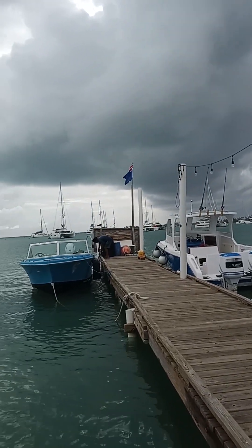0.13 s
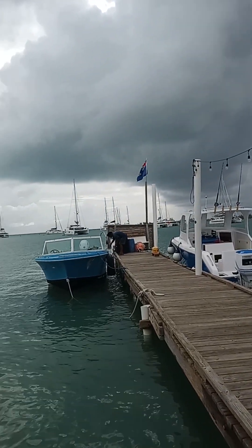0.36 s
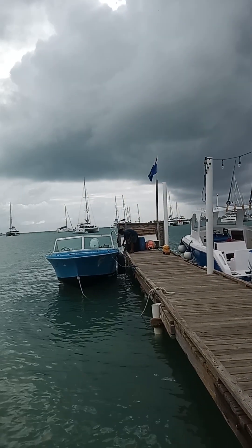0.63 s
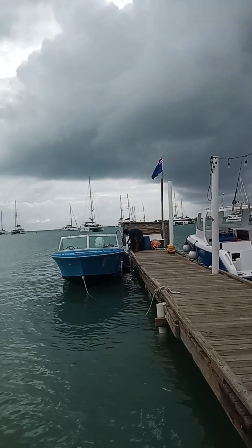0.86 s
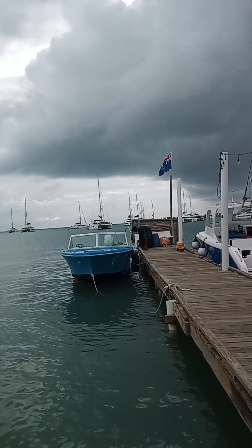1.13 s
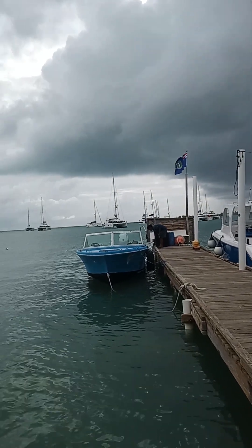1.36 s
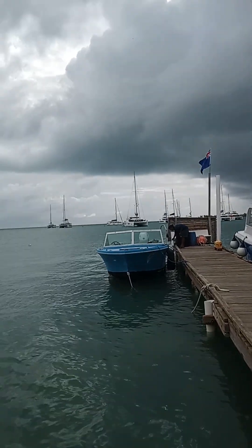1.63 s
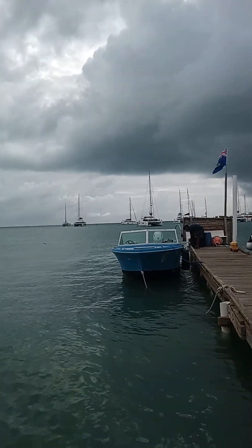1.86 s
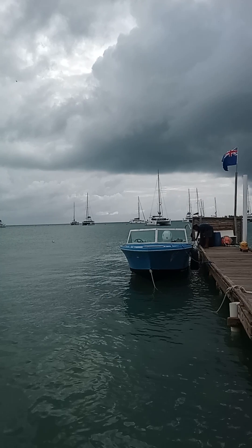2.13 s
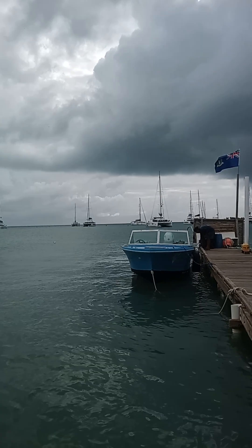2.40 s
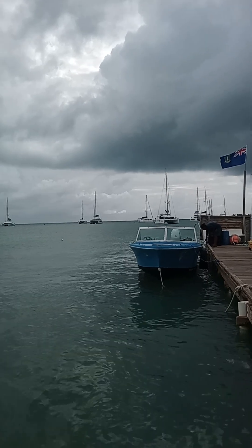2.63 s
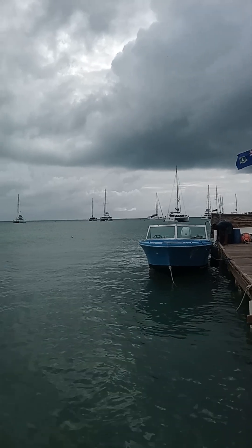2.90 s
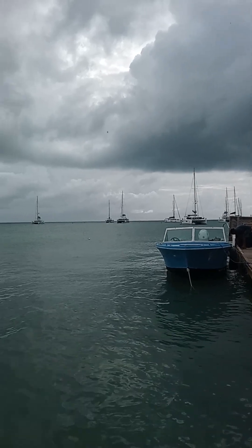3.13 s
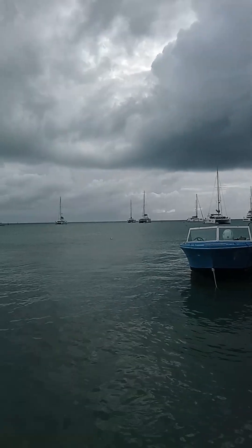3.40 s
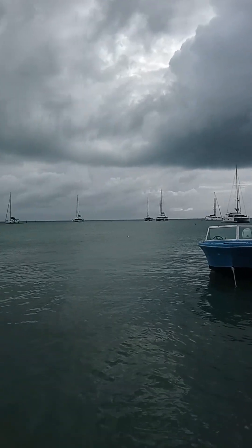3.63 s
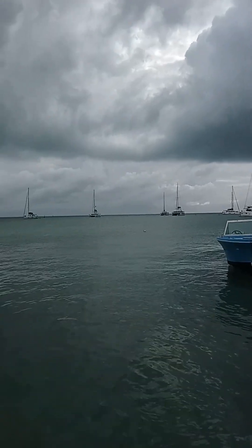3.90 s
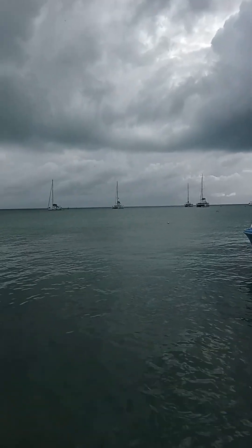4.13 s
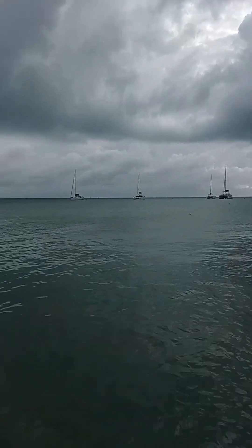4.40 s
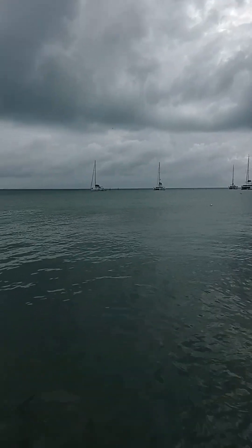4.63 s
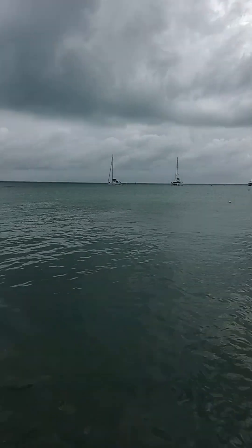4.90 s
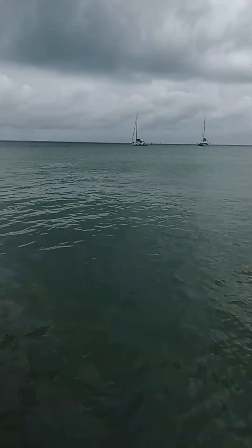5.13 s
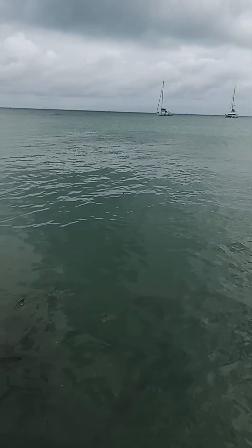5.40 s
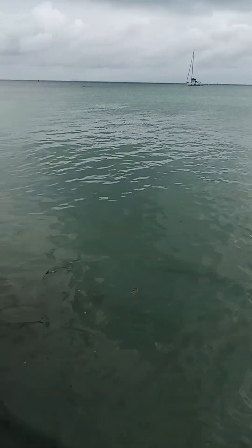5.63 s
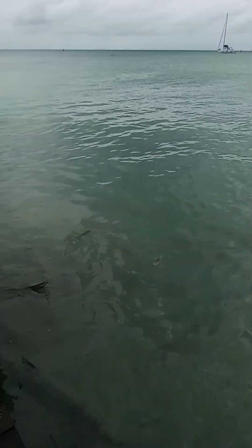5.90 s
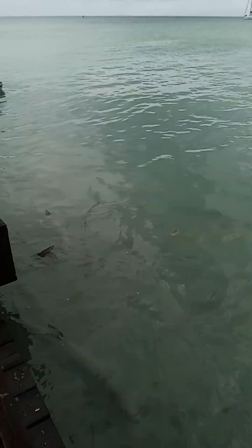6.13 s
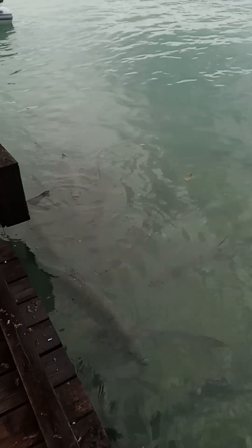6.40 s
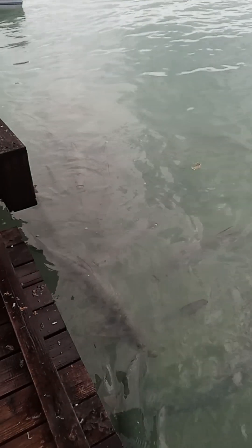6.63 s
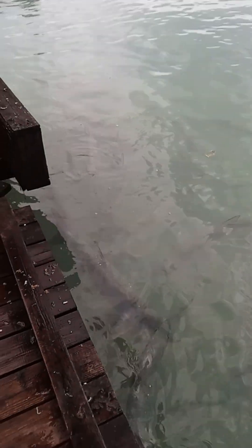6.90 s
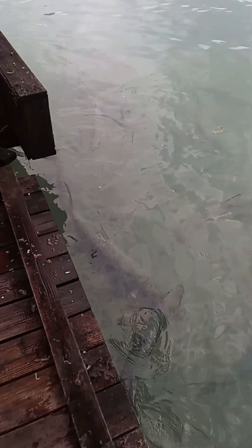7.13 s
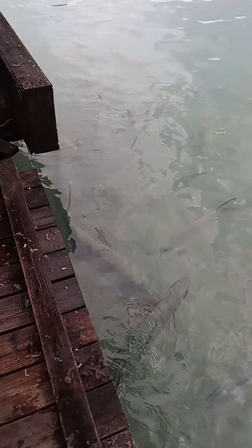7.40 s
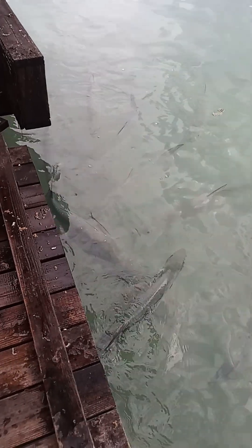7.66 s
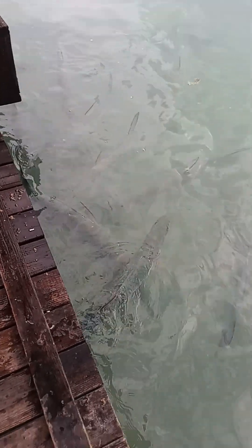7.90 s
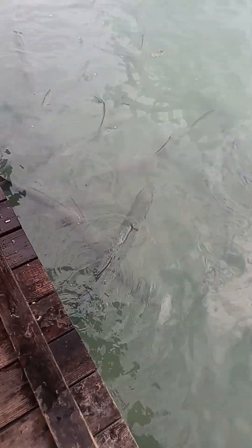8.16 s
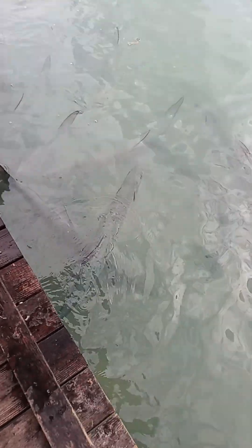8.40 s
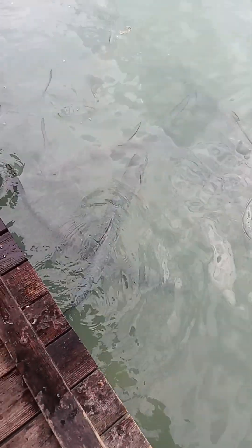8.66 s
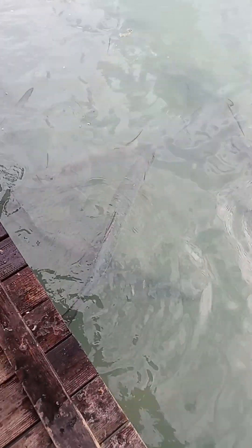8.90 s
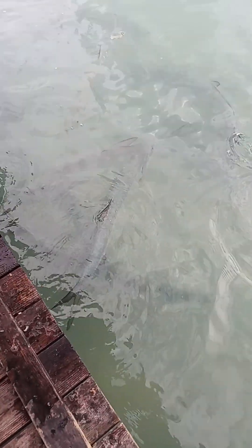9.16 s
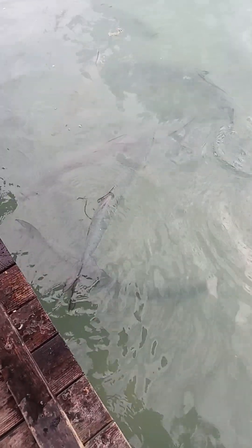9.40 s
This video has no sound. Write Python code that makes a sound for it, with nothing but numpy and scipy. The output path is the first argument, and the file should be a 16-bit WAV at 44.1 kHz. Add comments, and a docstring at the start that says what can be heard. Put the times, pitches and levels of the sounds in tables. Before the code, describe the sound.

Gritty ticks and muffled shuffles give way to solid, resonant steps on loose dock boards, each with a brief metallic rattle, over quiet hiss.

```python
"""Footsteps on a wooden dock

Someone shuffles softly over the planks, then walks firmly; each footfall is a crowd of small contacts
that rings beams and planks, clatters loose boards and nails and, in the firm walk, shakes loose metal.
Between the steps gear and grit tick as short resonant bursts, and dragged soles scuff over the grain.
Behind lie a low harbour hum and hiss of filtered noise, and faint far pings of wavering sine tones."""
import sys
import numpy as np
from scipy import signal
from scipy.fft import rfft, irfft
from scipy.io import wavfile
from scipy.ndimage import uniform_filter1d

SR = 44100
rng = np.random.default_rng(int(sys.argv[2]) if len(sys.argv) > 2 else 0)


def store_pcm(level_fs):
    """Save levels as 16-bit WAV."""
    pcm = np.round(np.clip(level_fs, -1, 1) * 32767).astype(np.int16)
    wavfile.write(sys.argv[1], SR, np.atleast_2d(pcm).T)


def linear_from_db(decibels):
    """Turn decibels (scalar or array-like) into linear amplitude factors; 0 gives 1."""
    return 10 ** (np.asarray(decibels, float) / 20)


N = 420273
CLOCK = np.arange(N) / SR   # s

# firm footfalls and the drive of the five loud metal modes .13 s after each:
# (heel time [s], mode 1 [dB], mode 2 [dB], mode 3 [dB], mode 4 [dB], mode 5 [dB])
FIRM_STEPS = [(3.8, -40, -44, -69.5, -46.5, -47), (4.6356, -54, -42, -51.5, -46, -47.5),
              (5.7626, -51.5, -47, -70, -52.5, -50), (6.3463, -54, -50, -66, -51.5, -49.5),
              (6.887, -67.5, -68.5, -44.5, -76.5, -55), (7.374, -57, -70.5, -71.5, -52, -64),
              (7.969, -56, -53.5, -54.5, -67, -60.5), (8.626, -51, -53.5, -65, -51, -61),
              (9.214, -63, -76, -111, -70.5, -72)]
# ringing of each firm footfall: (stretch of metal t60 [factor], time from heel to cut-off [s],
# stretch of wood t60 [factor], stretch of rattle t60 [factor])
STEP_RINGING = [(0.7, 0.86, 1, 1.2), (1, 0.415, 1.15, 1.2), (0.81, 0.71, 0.73, 1.04),
                (0.76, .37, 1.23, 1.005), (0.76, 0.357, 1.18, 1.05), (0.56, 0.37, 1.17, 1.1),
                (0.81, 0.39, 1, .9), (0.82, 0.27, 0.75, 0.53), (1.3, 0.32, 0.93, 0.81)]
# soft footfalls: (time [s], beam [dB], plank [dB], knock [dB], t60 [s])
SOFT_STEPS = [(0.641, -71, -21.5, -38, 0.13), (0.67, -66, -37.5, -39, 0.088),
              (0.962, -45, -19.5, -24.5, 0.098), (1.0, -39, -37, -34.5, 0.47),
              (1.045, -37, -27.5, -37, 0.18), (1.306, -41, -20.5, -44, 0.066), (1.325, -42, -28, -36, 0.45),
              (1.929, -29.5, -26, -40.5, 0.33), (2.02, -41.5, -50.5, -57, 0.22),
              (2.185, -69, -60, -48, 0.12), (2.722, -63, -48.5, -66, 0.11), (2.775, -60, -53.5, -57, 0.24),
              (3.685, -46, -52, -82, .3)]
# colour of loose boards, nails and grit: (frequency [Hz], spectrum level [dB])
RATTLE_COLOUR = [(1060, -8), (1800, -6.5), (2730, -5), (3230, 0), (4220, 0.5), (5680, -3), (7100, 0.5),
                 (8080, -15), (10800, -13), (12000, -37.5), (15600, -15), (16000, -32), (16500, -51)]


def rms_one(x):
    """Scales x to rms 1."""
    return x / np.sqrt(np.mean(x ** 2) + 1e-20)


def resonate(x, hz, width_hz):
    """Two-pole resonance with gain 1 on top."""
    r = np.exp(-np.pi * width_hz / SR)
    feedback = [1, -2 * r * np.cos(2 * np.pi * hz / SR), r * r]
    return signal.lfilter([(1 - r * r) / 2, 0, (r * r - 1) / 2], feedback, x)


def body(x, modes):
    """Parallel resonances with alternating signs, as of a board with several modes; rms 1."""
    total = 0
    for k, (hz, width_hz, db) in enumerate(modes):
        total = total + (-1) ** k * linear_from_db(db) / np.sqrt(width_hz) * resonate(x, hz, width_hz)
    return rms_one(total)


def coloured(x, spectrum):
    """Filters x by a spectrum (Hz, dB), read along log frequency; rms 1."""
    hz, db = np.transpose(spectrum)
    bins_hz = np.maximum(np.arange(N // 2 + 1) * SR / N, 1)
    return rms_one(irfft(rfft(x) * linear_from_db(np.interp(np.log(bins_hz), np.log(hz), db)), N))


def contacts(per_s, spread_db):
    """Uneven little impacts at random moments; rms 1."""
    sizes = linear_from_db(spread_db * np.minimum(rng.exponential(1, N), 4)) * rng.choice([-1, 1], N)
    return rms_one(sizes * (rng.random(N) < per_s / SR) + 1e-18)


def drift(rate_hz):
    """Slow chance of spread 1: noise through two equal low-passes at rate_hz, run at SR / 40."""
    r = np.exp(-80 * np.pi * rate_hz / SR)
    noise = rng.standard_normal(N // 40 + 2002)
    slow = signal.lfilter([1], [1, -2 * r, r * r], noise)[2000:]   # skips the settling
    return np.interp(np.arange(N) / 40, np.arange(len(slow)), rms_one(slow))


def clatter(low_hz, high_hz, sharpness, patchy_db, count):
    """Contacts dealt to many small resonances, each flickering on its own; rms 1."""
    grit, dealt = contacts(per_s=13000, spread_db=0.5), rng.integers(0, count, N)
    pitches = np.geomspace(low_hz, high_hz, count) * linear_from_db(rng.normal(0, 0.059, count))
    total = 0
    for k, hz in enumerate(np.minimum(pitches, 17000)):
        share = grit * (dealt == k) * linear_from_db(patchy_db * drift(17))
        total = total + resonate(share, hz, hz / sharpness)
    return rms_one(total)


def evened(x, span_s):
    """Holds the level of a ringing layer steady, so that its gain alone shapes it."""
    level = np.sqrt(uniform_filter1d(x ** 2, size=int(span_s * SR)).clip(0)) + .15
    return rms_one(x / level ** 0.92)


def blow(since, rise_s, t60, crack_db):
    """Gain after a blow: a quick rise, then a short crack over an exponential tail."""
    crack_t60_s = 0.044
    after = np.maximum(since - rise_s, 0)
    tail_and_crack = linear_from_db(-60 * after / t60) + linear_from_db(crack_db - 60 * after / crack_t60_s)
    return np.clip(since / rise_s, 0, 1) ** 2 * tail_and_crack


def swells(rows):
    """Gains of every dB column: each row (time, length, dB..) swells and fades, adding in power."""
    power = np.zeros((len(rows[0]) - 2, N))
    for s, length, *db in rows:
        span = slice(int(s * SR), int((s + length) * SR))
        done = ((CLOCK[span] - s) / length).clip(0, 1)
        arch = np.sin(np.pi * done ** .8).clip(0) ** 1.8
        power[:, span] += (linear_from_db(db)[:, None] * arch) ** 2
    return np.sqrt(power)


def last_hard_step():
    """Index of the latest firm footfall (-1 before the first) and the time since it."""
    starts = np.array(FIRM_STEPS)[:, 0]
    step = np.searchsorted(starts, CLOCK) - 1
    return step, np.maximum(CLOCK - starts[step], 0)


def hum_gain():
    """Steady lumps, swells and the thump of each firm footfall add in power."""
    # swells of the hum: (time [s], length [s], level [dB])
    hum_swells = [(0.0, 0.12, -56), (0.41, 0.11, -52.5), (0.53, 0.27, -49.5), (0.82, 0.17, -60),
                  (0.96, .27, -49.5), (1.27, .18, -53), (1.75, 0.16, -62), (1.89, 0.16, -51),
                  (2.98, 0.17, -56.5), (3.38, 0.26, -61), (4.06, 0.31, -54.5), (4.37, 0.3, -46.5),
                  (5.28, 0.2, -56), (6.15, 0.087, -42)]
    step, since = last_hard_step()
    thump = (step >= 0) * linear_from_db(-44.5) * blow(since, rise_s=.04, t60=0.8, crack_db=-19)
    steady = linear_from_db(-68 + 3 * drift(4))
    return np.sqrt(steady ** 2 + swells(hum_swells)[0] ** 2 + thump ** 2)


def harbour():
    """A lumpy noise hum near 85 Hz under a patchy hiss with tiny crackles in the treble."""
    # colour of the hiss: (frequency [Hz], spectrum level [dB])
    hiss_colour = [(65, -22.5), (110, -4), (458, -10.5), (1060, -16), (1900, -18.5), (2030, -23),
                   (3970, -25), (4310, -27.5), (4790, -25.5), (7130, -25), (8440, -46.5), (15200, -44.5),
                   (16500, -37)]
    # course of the hiss: (time [s], level [dB])
    hiss_course = [(0.0, -65.5), (0.3, -64), (1.3, -64.5), (2.4, -65.5), (3.6, -66.5), (4.2, -67.5),
                   (4.5, -63.5), (4.62, -75), (5.0, -69.5), (5.35, -65), (5.53, -71.5), (5.72, -67.5),
                   (6.0, -68.5), (6.75, -69.5), (7.2, -68.5), (7.8, -67), (8.5, -66), (9.53, -71.5)]
    hum = rms_one(resonate(resonate(rng.standard_normal(N), 85, 25), 80, 70))
    hum += linear_from_db(-12) * rms_one(resonate(resonate(rng.standard_normal(N), 55, 40), 55, 60))
    hiss = coloured(rng.standard_normal(N), hiss_colour) * linear_from_db(1.2 * drift(6))
    # the size of sparse treble impacts opens and shuts fresh noise
    impact_band = signal.butter(2, [4000, 16000], "band", fs=SR, output="sos")
    impacts = signal.sosfilt(impact_band, contacts(per_s=25, spread_db=5.0))
    crackle = uniform_filter1d(np.abs(impacts), size=500) * rng.standard_normal(N)
    crackle_band = signal.butter(2, [5000, 15500], "band", fs=SR, output="sos")
    hiss += linear_from_db(-15) * rms_one(signal.sosfilt(crackle_band, crackle))
    return hum_gain() * hum + linear_from_db(np.interp(CLOCK, *np.transpose(hiss_course))) * hiss


def pings():
    """Thin far tones, steady or gliding slightly in pitch, that waver, swell and fade."""
    # faint far pings: (time [s], length [s], first pitch [Hz], last pitch [Hz], level [dB])
    far_pings = [(.68, .1, 2500, 2500, -68), (1.42, .19, 1310, 1240, -66), (2.29, .17, 1265, 1250, -72),
                 (2.95, .07, 1890, 1880, -68), (1.8, .1, 1000, 940, -70), (2.94, .18, 1063, 1060, -71),
                 (8.43, .05, 1400, 1500, -63), (9.46, .09, 2500, 2500, -70), (9.47, .08, 2870, 2870, -74)]
    out, waver = np.zeros(N), linear_from_db(2.0 * drift(25))
    for s, length, first_hz, last_hz, db in far_pings:
        done = np.clip((CLOCK - s) / length, 0, 1)
        turns = length * (first_hz * done + (last_hz - first_hz) * done ** 2 / 2)
        swell = np.sqrt(2 * np.sin(np.pi * done).clip(0))
        out += linear_from_db(db) * swell * waver * np.sin(2 * np.pi * turns)
    return out


def scuffs():
    """A dragged sole knocks over the grain and stirs the grit."""
    # soles dragging over the wood: (time [s], length [s], low part [dB], high part [dB])
    drags = [(2.15, 0.096, -60, -49.5), (5.05, 0.097, -60.5, -53), (5.1, 0.075, -44, -45),
             (5.11, 0.11, -53, -50), (7.61, 0.08, -53.5, -39), (7.64, 0.076, -55, -42),
             (7.92, 0.0643, -71.5, -59), (8.17, 0.11, -56, -45.5)]
    low, high = swells(drags)
    knocks = clatter(550, 2600, sharpness=12, patchy_db=4.0, count=8)
    grit = clatter(2300, 16000, sharpness=20, patchy_db=5.0, count=16)
    return low * evened(knocks, span_s=.02) + high * coloured(grit, RATTLE_COLOUR)


def tick_rows():
    """The marked ticks, then faint ones at random moments and pitches."""
    # ticks of gear and grit: (time [s], nominal peak [dB], nominal pitch [Hz], t60 [s],
    # low part [dB], top part [dB])
    marked = [(0.0, -40.5, 6750, .13, -59, -61), (0.0293, -29, 5180, .27, -51.5, -53.5),
              (0.0753, -22, 3920, 0.07, -47.5, -51), (0.1366, -19, 4200, .2, -45.5, -47),
              (0.2298, -18, 5930, .11, -47, -33.5), (0.3351, -30.5, 6100, 0.1, -65, -53.5),
              (0.397, -50, 6700, 0.16, -70, -77), (0.4694, -51, 2280, 0.13, -57.5, -76),
              (1.274, -42.5, 3040, 0.087, -72, -62), (1.4585, -28, 6400, .037, -59, -41),
              (1.5662, -24.5, 4520, 0.045, -61, -63), (1.5933, -26.5, 4900, .058, -55, -39.5),
              (1.7769, -51, 2780, 0.24, -63, -67.5), (2.1805, -35, 7040, 0.13, -63, -51),
              (2.2019, -20.5, 2710, 0.05, -50, -38.5), (2.3481, -40, 4760, 0.026, -67, -85),
              (2.6747, -54, 7300, .16, -66, -64), (2.89, -48, 4730, .22, -64.5, -64.5),
              (3.3474, -72, 2370, .1, -75, -60.5), (3.4341, -36.5, 4400, 0.083, -49.5, -79.5),
              (3.5628, -40, 2760, .06, -61, -69), (3.6182, -32, 6000, 0.067, -76, -55),
              (3.6336, -47.5, 6060, .11, -85, -45.5), (3.6451, -24.5, 5700, .042, -59, -55.5),
              (3.7628, -34.5, 4760, 0.081, -56, -56.5), (3.7742, -38.5, 4680, .046, -37, -43),
              (4.1284, -36, 4050, 0.095, -77, -70), (4.2245, -34, 5900, 0.074, -59.5, -57),
              (4.3364, -45, 3180, 0.089, -80, -57.5), (4.3754, -54, 3260, 0.22, -61.5, -81.5),
              (4.4159, -32, 4020, .14, -63, -64), (4.4935, -29.5, 5740, .085, -50.5, -57.5),
              (4.8319, -22, 3680, .1, -45, -42.5), (4.9097, -38, 3890, .14, -46.5, -45.5),
              (4.9886, -41, 4010, 0.14, -53.5, -63.5), (5.2037, -40, 4200, .07, -73, -74.5),
              (5.2883, -37, 6660, 0.065, -65, -72.5), (5.4227, -27, 4600, .093, -48.5, -46),
              (5.6341, -54.5, 4350, 0.12, -51.5, -70.5), (5.9504, -42, 3970, 0.111, -60, -58),
              (6.134, -27, 4530, 0.096, -44.5, -46.5), (6.2073, -32, 4480, .11, -63.5, -56),
              (6.2932, -30.5, 3220, 0.095, -64, -85), (6.8018, -66, 2610, 0.16, -61, -70),
              (7.2275, -19.5, 4950, .08, -39.5, -45), (7.2674, -41, 3600, 0.069, -56.5, -69),
              (8.4018, -34.5, 4870, 0.038, -73, -72.5), (8.4224, -46.5, 3530, .17, -59, -75),
              (8.984, -48.5, 3900, .09, -70.5, -66), (9.0678, -51.5, 2490, 0.087, -87, -79.5)]
    faint_per_s, faint_loudest_db, faint_t60_s = .9, -53.5, .1
    draws = rng.random((int(faint_per_s * N / SR), 5))
    s, hz = draws[:, 0] * N / SR, 2300 * 3 ** draws[:, 2]
    db = faint_loudest_db - 8 * draws[:, 1]
    low_db, top_db = db - 4 - 12 * draws[:, 3], db - 8 - 14 * draws[:, 4]
    return np.r_[marked, np.c_[s, db, hz, np.full(len(db), faint_t60_s), low_db, top_db]]


def ticks():
    """Short bursts of grit ring small resonances around a pitch, with a woody low part and a dry top."""
    out, grit = np.zeros(N), contacts(per_s=13000, spread_db=1.0)
    rows = tick_rows()
    chance = rng.normal(0, 1, (len(rows), 7))
    top = signal.butter(4, 7800, "high", fs=SR, output="sos")
    for (s, db, hz, t60, low_db, top_db), jitter in zip(rows, chance):
        start = max(int((s - .003) * SR), 0)
        t = CLOCK[:min(int(.2 * SR), N - start)]
        burst = grit[start:start + len(t)]
        octaves = np.array([0, -.3, 0.15, -.6, .55]) + np.r_[0, .06 * jitter[:4]]
        middle = low = 0
        for o, f in zip(octaves, np.clip(hz * 2 ** octaves, 2000, 7600)):
            middle = middle + linear_from_db(-9 * abs(o)) * resonate(resonate(burst, f, f / 5), f, f / 22)
        for f in np.array([1050, 1500, 1950]) * 2 ** (0.19 * jitter[4:]):
            low = low + resonate(resonate(burst, f, 650), f, 120)
        fade = linear_from_db(-60 * t / np.clip(t60, .02, .3))
        shape = (fade + 0.68 * fade ** 4) * np.minimum(t / 0.0044, 1) ** 2   # a snap on top of the tail
        parts = linear_from_db(db - 10.5) * rms_one(middle) + linear_from_db(low_db) * rms_one(low)
        parts += fade ** .6 * linear_from_db(top_db) * rms_one(signal.sosfilt(top, burst))   # the top dies sooner
        out[start:start + len(t)] += shape * parts
    return out


def metal():
    """Firm footfalls shake narrow metal modes; the shaking dies away unevenly, then is faded out quickly."""
    # pitches of the modes, the five loud ones first: (frequency [Hz])
    mode_hz = [3205, 3860, 4240, 4670, 6420, 2070, 7110, 8370, 10500]
    # the same modes: (width [Hz], t60 of the shaking before its stretch [s])
    mode_decay = [(38, .85), (95, .9), (110, .75), (32, .9), (60, .7), (45, .6), (50, .55), (35, .75),
                  (70, .5)]
    # the last four modes against the mean of the loud five: (level [dB])
    weak_modes = [-9, -4.5, -15.5, -23.5]
    loud, (step, since), out = np.array(FIRM_STEPS)[:, 1:], last_hard_step(), np.zeros(N)
    strengths_db = np.c_[loud, loud.mean(axis=1)[:, None] + weak_modes]
    stretch, cutoff_s = np.array(STEP_RINGING)[step, :2].T
    still_open = (step >= 0) * np.clip((cutoff_s - since) / 0.044, 0, 1)
    for hz, (width_hz, t60), db in zip(mode_hz, mode_decay, strengths_db.T):
        shake = still_open * linear_from_db(db[step] - 60 * (since - .13) / (t60 * stretch))
        ring = resonate(contacts(per_s=900, spread_db=3.5) * shake + 1e-18, hz, width_hz)
        out += ring * np.sqrt(3 * SR / (np.pi * width_hz))   # makes up for the narrow width
    return out


def landing_gains():
    """Gains of beam, plank, knock and rattle: blows add in power; firm ones are cut off by a short fade."""
    # firm walking, heel, then ball of the foot, now and then a board slapping back:
    # (time [s], beam [dB], plank [dB], knock [dB], rattle [dB])
    landings = [(3.797, -31.5, -32.5, -37, -24), (3.865, -33, -47.5, -42, -32),
                (4.633, -40, -34, -36, -20.5), (4.68, -28.5, -30.5, -39.5, -30.5),
                (4.729, -41, -37.5, -38, -32.5), (5.761, -31.5, -36, -36.5, -21.5),
                (5.785, -40.5, -25, -38.5, -27), (5.839, -33, -36, -43, -40.5),
                (5.94, -51, -34.5, -47, -44), (6.345, -36, -21.5, -32, -24.5), (6.4, -24.5, -27, -36, -29),
                (6.885, -34, -23, -27, -23.5), (6.926, -22, -39.5, -40.5, -33.5),
                (6.949, -34, -27, -29.5, -30), (7.371, -30, -18, -25.5, -25),
                (7.41, -21.5, -30, -30.5, -34.5), (7.965, -28.5, -20, -27.5, -23.5),
                (7.995, -22, -27.5, -32, -31), (8.03, -26, -29, -40.5, -31),
                (8.621, -41.5, -30, -28.5, -20.5), (8.678, -29, -35, -45.5, -32),
                (9.212, -24, -18, -25.5, -24.5), (9.264, -25, -36, -37, -33), (9.32, -52, -40.5, -51, -64)]
    # a heel landing in beam, plank, knock, rattle: (rise [s], unstretched t60 [s], crack over tail [dB])
    layers = [(0.022, .33, -9), (.007, 0.29, -1), (0.0045, 0.39, -2.5), (0.0037, 0.41, 4.5)]
    # soft landings in beam, plank, knock: (rise [s])
    soft_rise = [0.0227, .01, 0.0071]
    # soles shuffling under the soft footfalls: (time [s], length [s], level [dB])
    shuffles = [(0.57, 0.057, -48.5), (0.6, 0.13, -44.5), (0.96, 0.097, -49), (0.98, 0.13, -42.5),
                (1.31, 0.11, -51), (1.34, .13, -49), (1.925, 0.048, -47), (1.94, 0.11, -58.5),
                (2.74, 0.2, -74)]
    cutoff_fade_s, soft_damping_db_per_s2 = .08, 899
    power, heels = np.zeros((4, N)), np.array(FIRM_STEPS)[:, 0]
    rise_s, t60, crack_db = np.transpose(layers)[:, :, None]
    for s, *db in landings:
        step = np.searchsorted(heels, s + .01) - 1
        span = slice(int(s * SR), int((s + .7) * SR))
        _, cutoff_s, wood, loose = STEP_RINGING[step]
        # landings after the heel arrive more softly: slower above the beams, with less crack
        follows = s - heels[step] > .01
        slower = 2.7 ** (follows * np.c_[[0, 1, 1, 1]])
        stretch = np.c_[[wood, wood, wood, loose]]
        shape = blow(CLOCK[span] - s, rise_s * slower, t60 * stretch, crack_db - follows * 10)
        still_open = np.clip(1 + (heels[step] + cutoff_s - CLOCK[span]) / cutoff_fade_s, 0, 1)
        power[:, span] += (linear_from_db(db)[:, None] * still_open * shape) ** 2
    for s, *db, soft_t60 in SOFT_STEPS:
        span = slice(int(s * SR), int((s + .4) * SR))
        since = CLOCK[span] - s
        # the sole stays on the board and chokes the ring more and more
        choke = linear_from_db(-soft_damping_db_per_s2 * since ** 2)
        shape = blow(since, np.c_[soft_rise], soft_t60, crack_db=-21) * choke
        power[:3, span] += (linear_from_db(db)[:, None] * shape) ** 2
    power[3] += swells(shuffles)[0] ** 2
    return np.sqrt(power)


def footfalls():
    """The foot lands as a crowd of contacts: wood modes below, a clatter of loose boards and nails above."""
    # beams under the dock: (frequency [Hz], width [Hz], level [dB])
    beam_modes = [(130.5, 30, -2), (154, 25, 0), (179.3, 27, 1), (207, 99, 2)]
    # planks underfoot: (frequency [Hz], width [Hz], level [dB])
    plank_modes = [(274, 13, -5.5), (301.7, 60, -1), (352.6, 43, 4.5), (377, 45, 1), (453, 74, -11.5)]
    # colour of the firm knock: (frequency [Hz], spectrum level [dB])
    knock_colour = [(300, -25.5), (500, 1.5), (800, -1.5), (1300, -4.5), (2000, -6.5), (2800, -3.5)]
    # board modes under soft steps: (frequency [Hz], width [Hz], level [dB])
    soft_knock_modes = [(537, 160, -5), (728, 83, 1.5), (1106, 170, -6.5), (1550, 140, -11),
                        (1820, 230, -16.5)]
    # colour of the shuffling soles: (frequency [Hz], spectrum level [dB])
    shuffle_colour = [(1060, -29), (1800, -3), (4990, -9), (6410, -4), (8160, -14), (10200, -8),
                      (12700, -28), (15300, -8), (16000, -23), (16500, -35)]
    beam, plank, knock, rattle = landing_gains()
    step, since = last_hard_step()
    firm_s, soft_s = np.array(FIRM_STEPS)[:, 0], np.array(SOFT_STEPS)[:, 0]
    heel = np.zeros(N)
    heel[(np.r_[firm_s, soft_s + .003] * SR).astype(int)] = 14   # the first contact is always firm

    beam_ring = resonate(body(contacts(per_s=300, spread_db=4.5), beam_modes), 175, 170)
    wood = beam * evened(beam_ring, span_s=.03)
    wood += beam * linear_from_db(-27.5) * rms_one(resonate(rng.standard_normal(N), 50, 45))   # the whole dock gives
    plank_ring = body(contacts(per_s=700, spread_db=1.0) + heel, plank_modes)
    wood += plank * evened(plank_ring, span_s=0.014)
    knocks = clatter(480, 2100, sharpness=13, patchy_db=4.0, count=14)
    hard_knock = evened(coloured(knocks, knock_colour), span_s=0.024)
    soft_knock = body(contacts(per_s=1100, spread_db=-1.0) + heel, soft_knock_modes)
    wood += knock * np.where(step >= 0, hard_knock, soft_knock)

    loose = clatter(1900, 16000, sharpness=22, patchy_db=4.5, count=36)
    hard = evened(coloured(loose, RATTLE_COLOUR), span_s=0.012)
    top = signal.sosfiltfilt(signal.butter(3, 8200, "high", fs=SR, output="sos"), hard)
    hard += top * (linear_from_db(5.0 - 31 * since + 1.8 * drift(30)) - 1)   # the top dies first
    firm_walk = CLOCK > firm_s[0] - .01
    return wood + rattle * linear_from_db(-1.5) * np.where(firm_walk, hard, coloured(loose, shuffle_colour))


def scene():
    """The harbour behind, the small sounds of gear and soles, and the footfalls, in one channel."""
    return (harbour() + pings() + scuffs() + ticks() + metal() + footfalls())[None]


def low_pass(x):
    """Removes everything above the highest recorded frequency."""
    return signal.sosfilt(signal.butter(12, 16980, fs=SR, output="sos"), x)


def record(dry):
    """Rounds the loud peaks smoothly and sets the final level."""
    return low_pass(0.56 * np.tanh(dry / 0.66))


dry = scene()
out = record(dry)
store_pcm(out)
```